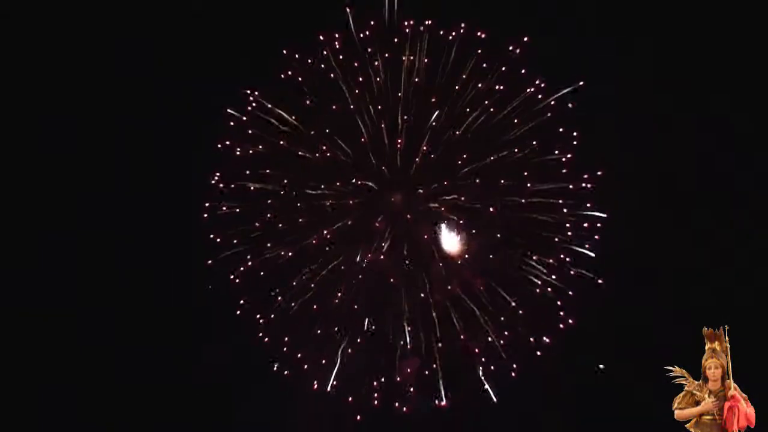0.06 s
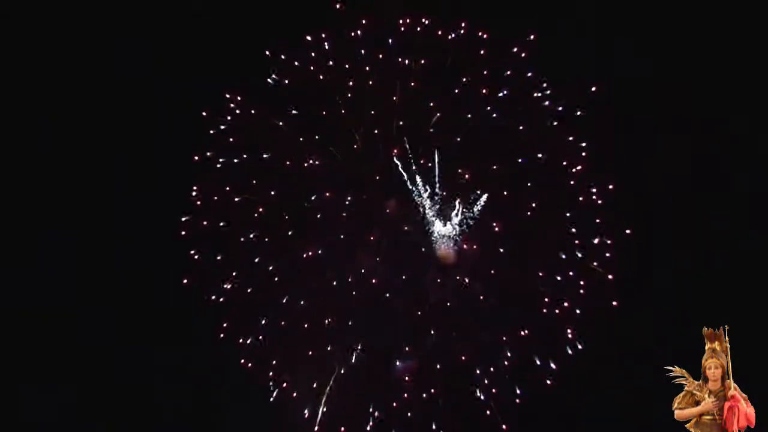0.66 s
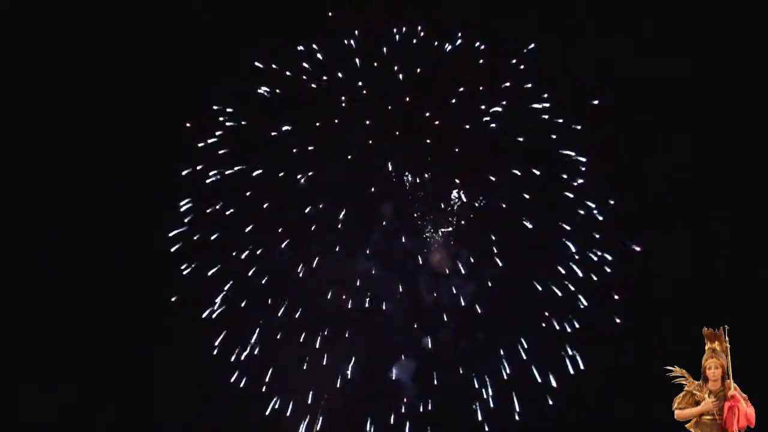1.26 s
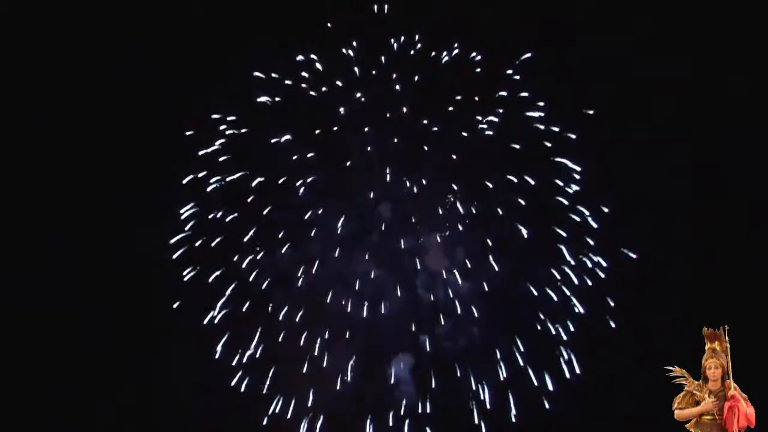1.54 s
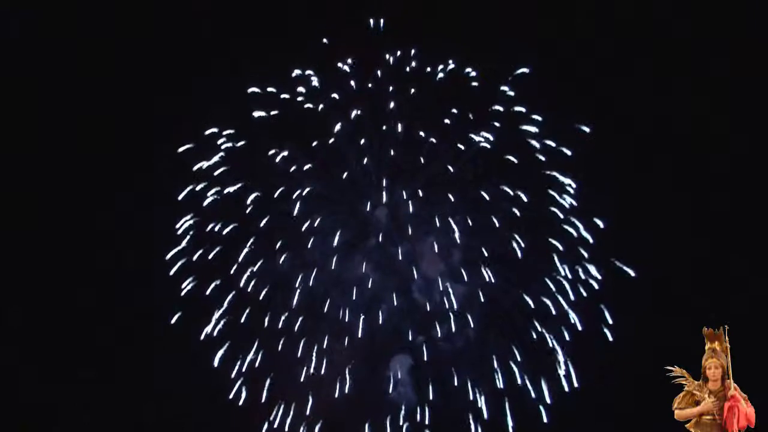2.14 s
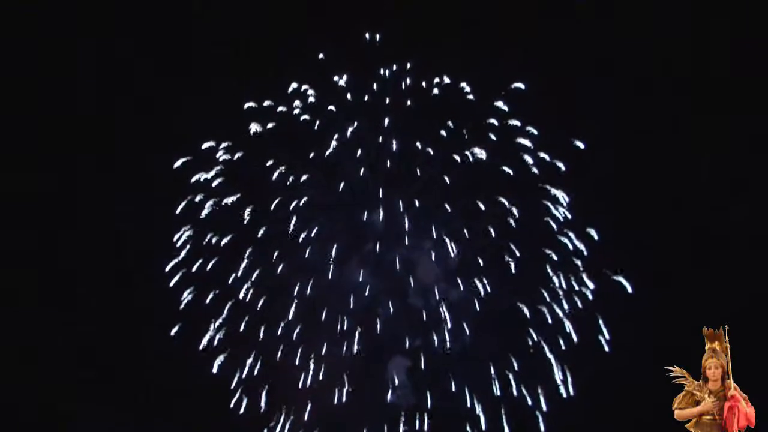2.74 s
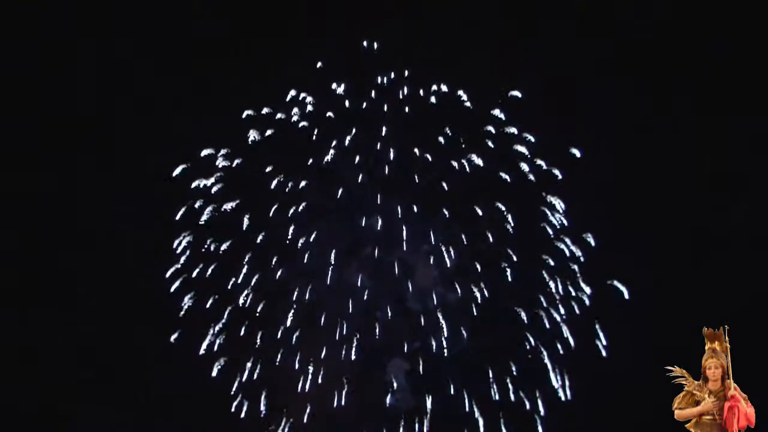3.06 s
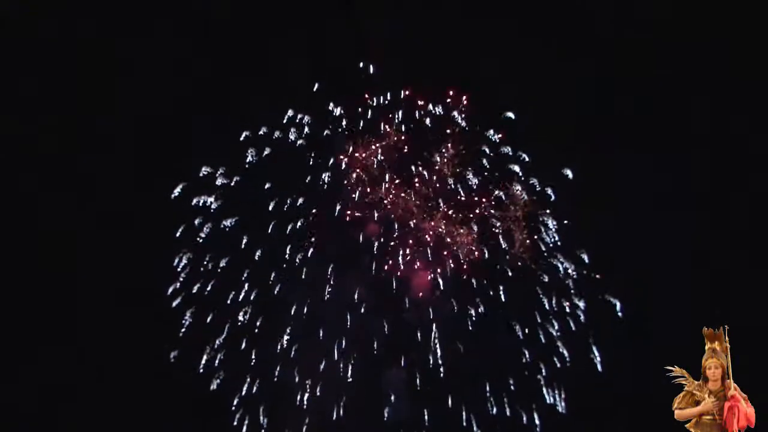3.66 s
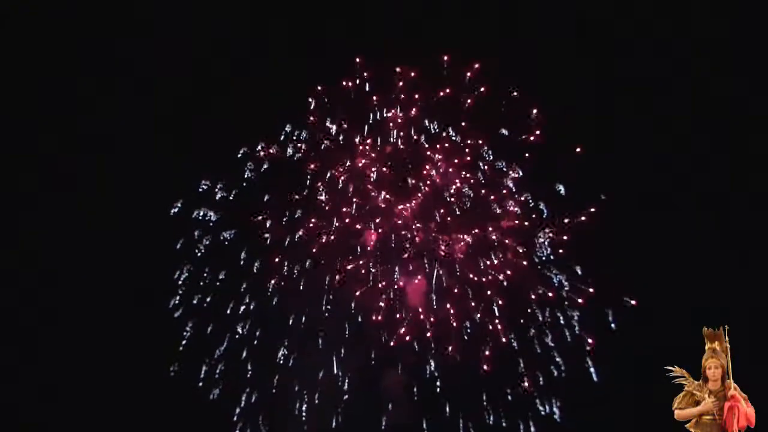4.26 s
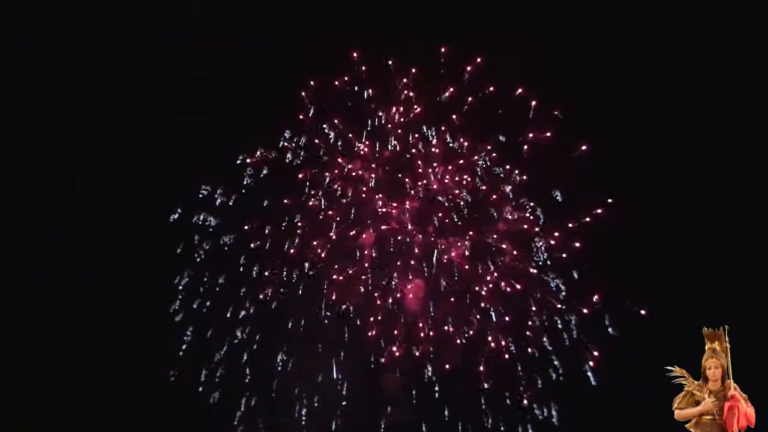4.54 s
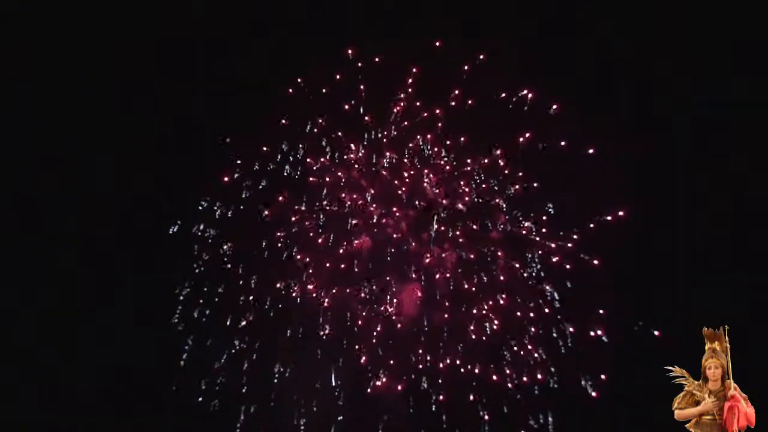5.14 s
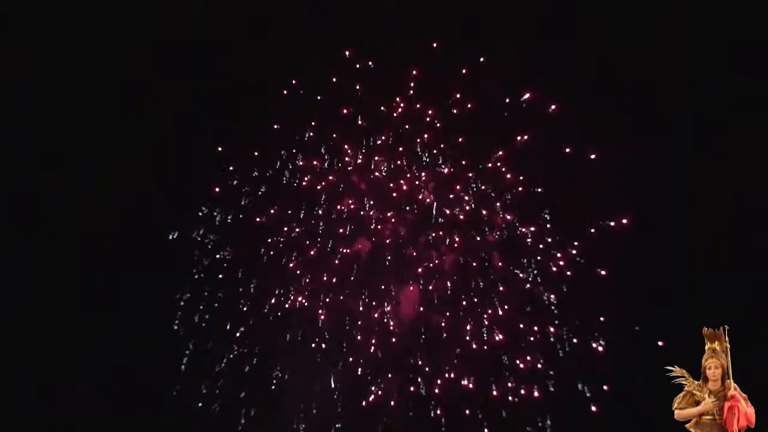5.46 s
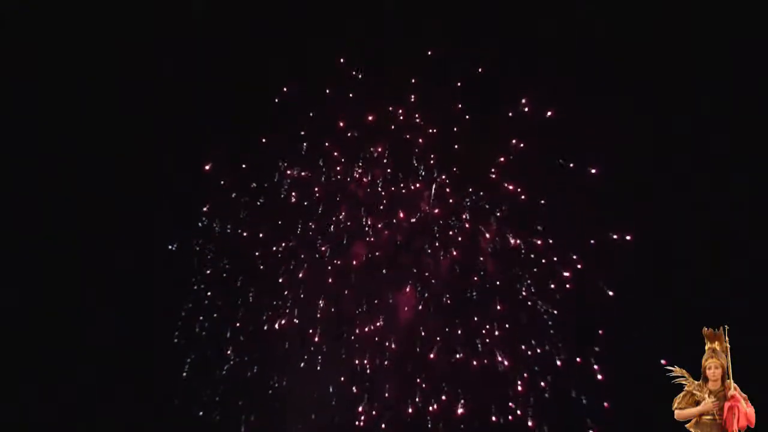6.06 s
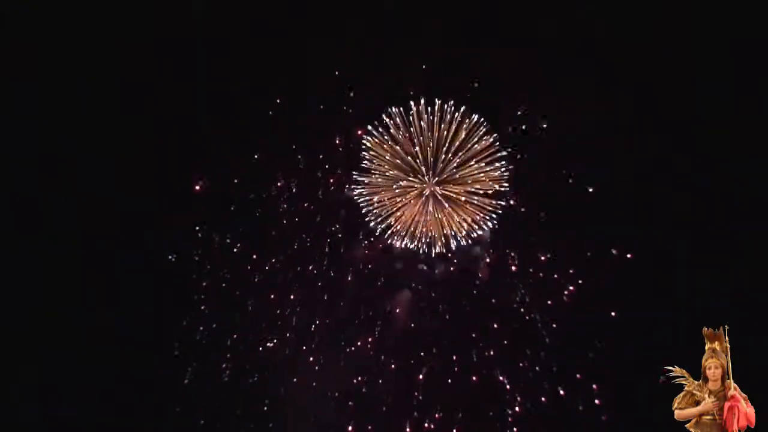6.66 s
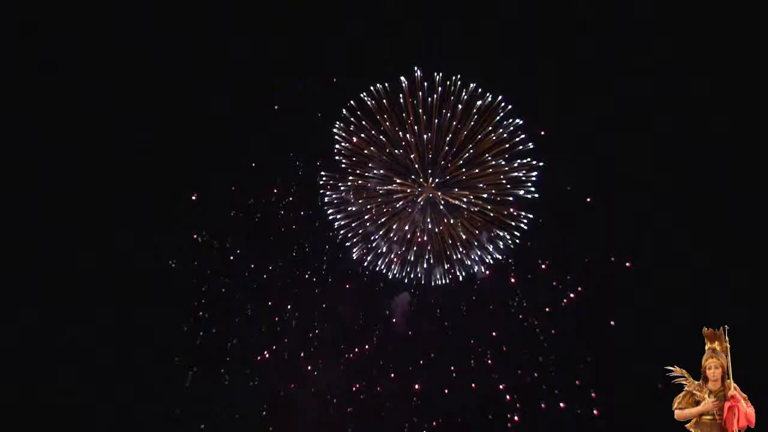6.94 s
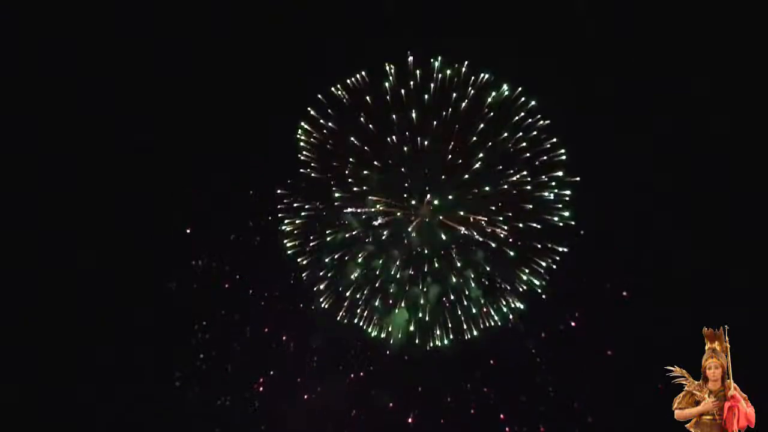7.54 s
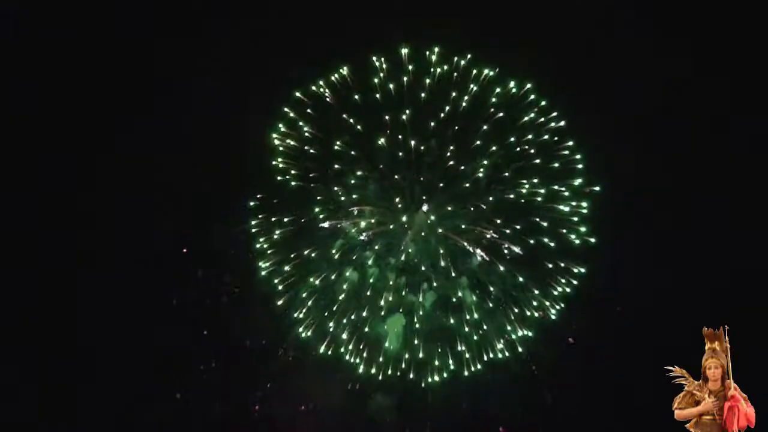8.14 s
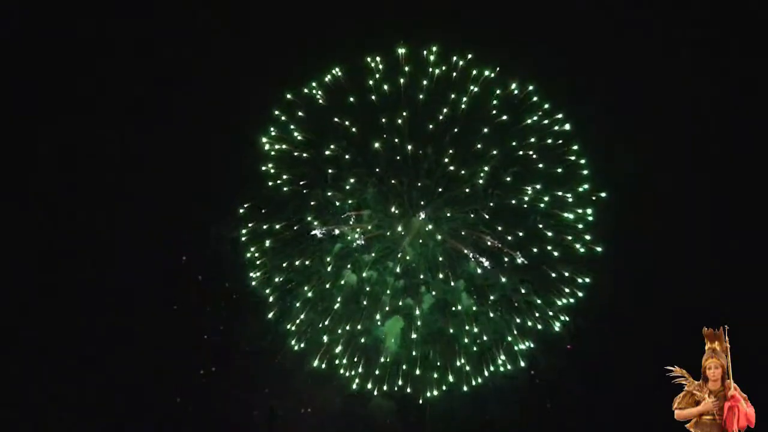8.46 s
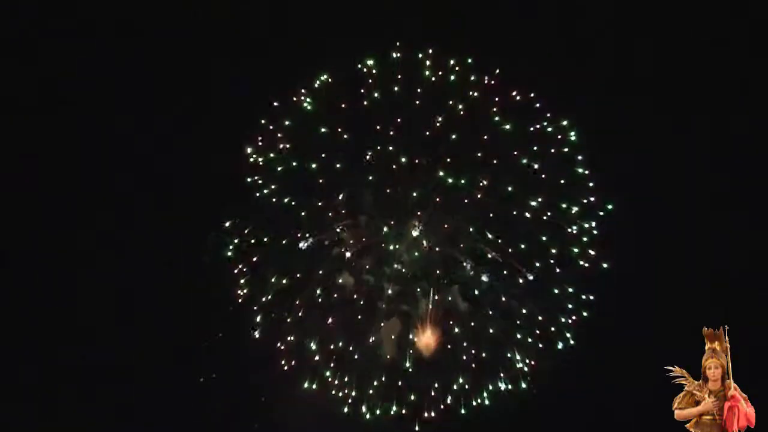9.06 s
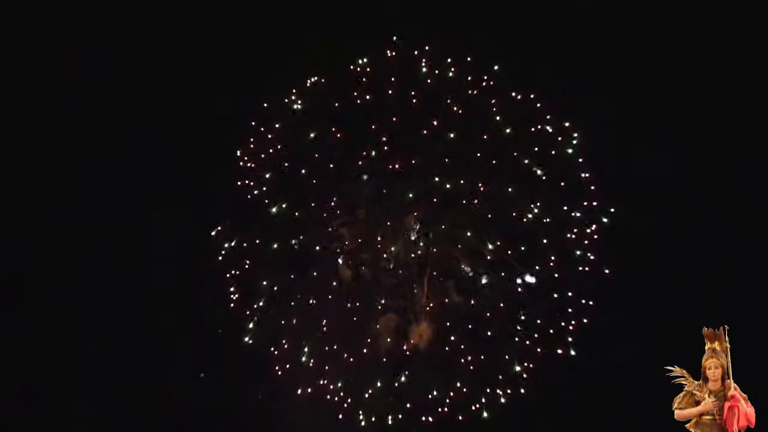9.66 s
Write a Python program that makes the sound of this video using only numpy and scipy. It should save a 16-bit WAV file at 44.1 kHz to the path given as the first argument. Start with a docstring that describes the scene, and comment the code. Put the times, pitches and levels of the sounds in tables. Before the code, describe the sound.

Fireworks burst outdoors with a sharp crack, a rapid salvo and a big echoing boom, amid crackling hiss and brief whistles.

```python
"""Fireworks a few hundred metres away at night, heard by a small overloaded stereo microphone.
A shell's echo is rolling at the start; burning stars hiss, tick and pop. At 1.2 s a shell cracks and
releases comets, whose gas jets hiss and whistle. A mortar thumps at 3.9 s, a salvo of small shells
follows at 4.7 s, one big boom at 8 s, another mortar at 8.9 s. Each burst is a shock front that
rolls back from ground, buildings and hills."""
import sys
import numpy as np
from scipy import signal
from scipy.fft import rfft, irfft, next_fast_len
from scipy.io import wavfile
from scipy.ndimage import uniform_filter1d

SR = 44100
rng = np.random.default_rng(int(sys.argv[2]) if len(sys.argv) > 2 else 0)


def dump_mix(stems):
    """Bounce the given channels to the path in sys.argv[1] as a 16-bit WAV at rate SR."""
    frames = np.atleast_2d(stems).T  # one column per channel
    limited = np.clip(frames, -1, 1)  # hard clip at full scale
    pcm = np.round(limited * 32767).astype(np.int16)
    wavfile.write(sys.argv[1], SR, pcm)


N = 432180
LEAD_S = .5  # early start: a shell is already rolling at t = 0
TIME = np.arange(-round(LEAD_S * SR), N) / SR


def amp(db):
    """Decibels to gain."""
    return 10 ** (np.asarray(db) / 20)


def unit_rms(x):
    """Scales to rms 1."""
    return x / np.sqrt(np.mean(x ** 2) + 1e-20)


def lookup(table, hz, column=1):
    """Interpolates a column over log frequency."""
    columns = np.transpose(table)
    return np.interp(np.log(hz + 1), np.log(columns[0] + 1), columns[column])


def add(mix, at_s, sound):
    """Mixes a sound in at at_s."""
    part = mix[..., max(round((at_s + LEAD_S) * SR), 0):][..., :sound.shape[-1]]
    part += sound[..., :part.shape[-1]]


def seconds(size):
    """Time axis of size samples."""
    return np.arange(size) / SR


def swell(t, rise_s):
    """Rises to 1 at rise_s, then decays."""
    u = np.maximum(t, 0) / rise_s
    return u * np.exp(1 - u)


def convolve(response, pulse):
    """Stereo response to a mono pulse, cut to the pulse's length."""
    return signal.fftconvolve(response, pulse[None], axes=1)[:, :len(pulse)]


def colour(x, spectrum, size=4096):
    """Minimum-phase filter."""
    log_gain = np.log(amp(lookup(spectrum, abs(np.fft.fftfreq(size, 1 / SR)))))
    taps = np.fft.ifft(np.exp(np.conj(signal.hilbert(log_gain)))).real[:size // 2]
    return signal.oaconvolve(np.atleast_2d(x), taps[None], axes=1)[:, :x.shape[-1]]


def clumps(size, depth_db, span):
    """Random gain, smoothed over span points."""
    drift = unit_rms(uniform_filter1d(rng.standard_normal(size), span))
    return unit_rms(amp(depth_db * drift))


# diffuse-field width: f/Hz, side re mid/dB
STEREO_WIDTH = [(30, -22.5), (150, -15.5), (500, -8), (2000, -8.5), (4000, -4), (8000, -13), (14000, -5)]

def diffuse(size, spectrum=None):
    """Stereo noise from all around, nearly mono in the bass."""
    n_fft = next_fast_len(size, True)
    hz = np.fft.rfftfreq(n_fft, 1 / SR)
    mid, side = rfft(rng.standard_normal((2, n_fft)))
    side = side * amp(lookup(STEREO_WIDTH, hz))
    gain = 1 if spectrum is None else amp(lookup(spectrum, hz))
    return unit_rms(irfft(np.array([mid + side, mid - side]) * gain, n_fft)[:, :size])


def echoes(bands, size, clump_db=0, stretch=1):
    """Dense reflections; each band decays with its own t60, times stretch."""
    hz, t, bins = signal.stft(diffuse(size), SR, nperseg=256, noverlap=192)
    t60_s = stretch * lookup(bands, hz, column=2)[:, None]
    level_db = lookup(bands, hz)[:, None] - 60 * t / t60_s
    bins = bins * amp(level_db) * clumps(len(t), clump_db, span=14)
    return signal.istft(bins, SR, nperseg=256, noverlap=192)[1][:, :size] / np.sqrt(SR)


# night ambience: f/Hz, density/dB
NIGHT_SPECTRUM = [(15, -34.5), (25, -6.5), (98, -5.5), (115, -11), (243, -19.5), (301, -21.5), (344, -25.5),
                  (475, -22), (1910, -25), (2240, -27.5), (2560, -30.5), (3930, -36), (5010, -47.5),
                  (6200, -35), (15000, -62.5)]

def night(level_db=-65.5):
    """Faint, steady, low noise."""
    return amp(level_db) * diffuse(len(TIME), NIGHT_SPECTRUM)


# gas rush: f/Hz, density/dB
GAS_SPECTRUM = [(60, -3.5), (200, -6.5), (300, -3), (600, -5), (1100, -5.5), (2400, -10.5), (3500, -19.5),
                (6500, -24.5), (9000, -37.5), (14000, -61)]
# launches: t/s, thump level/dB, thump f/Hz, rush level/dB, rush delay/s, rush rise/s
MORTAR_SHOTS = [(3.915, -37.5, 43, -47.5, 0.013, 0.024), (8.882, -30, 52.1, -34, 0.0029, 0.017)]

def mortars(echo_db=-20, echo_rise_s=.099):
    """A low push from the tube, then a rush of gas that lingers over the field."""
    out, t = np.zeros((2, len(TIME))), seconds(SR)
    push = swell(t, rise_s=.012) ** 2
    for at_s, thump_db, hz, rush_db, delay_s, rise_s in MORTAR_SHOTS:
        add(out, at_s, amp(thump_db) * push * np.sin(2 * np.pi * hz * t))
        rush = swell(t - delay_s, rise_s) ** .62 + amp(echo_db) * swell(t - delay_s, echo_rise_s)
        add(out, at_s, amp(rush_db) * rush * diffuse(len(t), GAS_SPECTRUM))
    return out


def snap(bandwidth_hz, scatter_db, decay_s):
    """One tiny explosion: a pressure pulse and its scatter."""
    t = seconds(2400)
    u = np.pi * bandwidth_hz * t
    pulse = (u - 1) * np.exp(-u)
    scatter = diffuse(len(t)) * np.exp(-t / decay_s) / np.sqrt(decay_s * SR / 2)
    return pulse + amp(scatter_db) * convolve(scatter, pulse)


# star hiss: f/Hz, density/dB
SIZZLE_SPECTRUM = [(100, -14), (300, -10), (500, 3), (1300, 1.5), (2700, -2.5), (3400, -13.5), (4300, -8),
                   (5100, -17.5), (7000, -18), (9000, -29), (15000, -45.5)]
# colour of ticks and pops: f/Hz, gain/dB
SNAP_EQ = [(100, -50), (400, -9.5), (800, 1.5), (2400, 9), (3400, 1.5), (4500, 0.5), (7000, -10),
           (9000, -30), (15000, -30)]
# burning star clouds: t/s, hiss level/dB, hiss fade/(dB/s), tick level/dB
CLOUDS = [(-.3, -42.5, 12.5, -28.5), (1.9, -69, 5, -59.5), (8.0, -58, 3, -39.5)]

def crackle(count=700, rise_s=.4, tick_fade_db_per_s=7):
    """Star clouds light up, then hiss and tick at random as they fade."""
    hiss_gain, tick_gain = np.zeros((2, len(TIME)))
    for at_s, hiss_db, hiss_fade_db_per_s, tick_db in CLOUDS:
        lit = np.clip((TIME - at_s) / rise_s, 0, 1)
        age_s = np.maximum(TIME - at_s - rise_s, 0)
        hiss_gain = np.hypot(hiss_gain, lit * amp(hiss_db - hiss_fade_db_per_s * age_s))
        tick_gain = np.hypot(tick_gain, lit * amp(tick_db - tick_fade_db_per_s * age_s))
    ticks = np.zeros((2, len(TIME)))
    for when, size in rng.random((count, 2)):
        i = int(when * len(TIME))
        tick = snap(bandwidth_hz=3000, scatter_db=2, decay_s=.0037)
        add(ticks, TIME[i], size ** 2 * tick_gain[i] * tick)
    return colour(ticks, SNAP_EQ) + hiss_gain * diffuse(len(TIME), SIZZLE_SPECTRUM)


# loudest stars: t/s, relative level/dB, bandwidth/Hz
STAR_POPS = [(0.354, -31, 1270), (0.5491, -26.5, 1760), (0.5881, -25, 2360), (0.6366, -31.5, 1270),
             (0.6736, -36, 2040), (0.7956, -33.5, 1550), (0.8936, -33.5, 1750), (0.9554, -33.5, 1670),
             (0.9766, -31.5, 1770), (1.0824, -30, 1530), (2.5847, -33.5, 2260), (2.6489, -41, 2130),
             (2.7616, -30.5, 1477), (2.8155, -43.5, 1445), (3.1477, -39, 1800), (3.1751, -33, 1500),
             (3.2121, -44.5, 1340), (3.4291, -47, 1517), (3.5737, -33, 2258), (5.2193, -28, 1680),
             (5.8001, -32, 1866), (6.3905, -36.5, 1370)]

def pops(gain_db=2, scatter_db=-4, decay_s=.0095):
    """Stars pop; the ground returns each pop about 4 ms later."""
    out = np.zeros((2, len(TIME)))
    for at_s, db, bandwidth_hz in STAR_POPS:
        add(out, at_s, amp(db) * snap(bandwidth_hz, scatter_db, decay_s))
        ground_s = rng.uniform(.00391, .004002)
        add(out, at_s + ground_s, amp(db) * snap(bandwidth_hz, scatter_db, decay_s))
    return amp(gain_db) * colour(out, SNAP_EQ)


# comet jets: f/Hz, density/dB
JET_SPECTRUM = [(150, -42), (250, -33), (294, -16), (619, -17), (716, -5), (829, -17.5), (928, -3),
                (1090, -8.5), (1800, -7.5), (2340, -7), (2840, -8), (3450, -18), (3990, -14.5),
                (6810, -26.5), (12000, -73.5), (15600, -113), (22000, -120)]

def comets(full_s=1.455, burn_s=.45, full_db=-30, sputter_db=3):
    """Jets of burning gas flare, sputter, burn down and leave a dulling echo."""
    rise_db_per_s, sag_db_per_s, out_db_per_s = 150, 21.5, 60
    echo_start_db, echo_fade_db_per_s, dull_db_per_octave_s = -15, 16, 3.5
    hz, t, bins = signal.stft(diffuse(len(TIME), JET_SPECTRUM), SR, nperseg=512)
    sputter = uniform_filter1d(rng.standard_normal(bins.shape), 3, axis=1)
    sputter = unit_rms(uniform_filter1d(sputter, 24, axis=0))
    age_s = t - LEAD_S - full_s
    early_s, burnt_s, spent_s = np.maximum([-age_s, age_s, age_s - burn_s], 0)
    jet_db = -sag_db_per_s * burnt_s - out_db_per_s * spent_s
    echo_db = echo_start_db - echo_fade_db_per_s * burnt_s
    level_db = full_db - rise_db_per_s * early_s + np.maximum(jet_db, echo_db)
    octaves = np.log2(np.maximum(hz, 200) / 2000)[:, None]
    dull_db = dull_db_per_octave_s * np.minimum(spent_s, 1) * octaves
    bins = bins * amp(level_db - dull_db + sputter_db * sputter)
    return signal.istft(bins, SR, nperseg=512)[1][:, :len(TIME)]


# comet whistles: t/s, length/s, start f/Hz, target f/Hz, level/dB, width/Hz
WHISTLE_TONES = [(1.4, .56, 2800, 2215, -36.5, 300), (1.761, 0.67, 2322, 2220, -44.5, 120),
                 (1.959, 0.24, 2190, 2076, -43.5, 14), (2.209, 0.3, 2142, 2086, -45.5, 5),
                 (2.441, 0.28, 2125, 2294, -53, 85)]

def whistles(settle_share=.37, peak_share=.32, octave_db=-23, flutter=.34, rasp_rad=.5):
    """Burning tubes glide towards a pitch; tumbling and echoes smear it into a narrow band."""
    out = np.zeros((2, len(TIME)))
    for at_s, length_s, start_hz, target_hz, db, width_hz in WHISTLE_TONES:
        progress = np.arange(0, length_s, 1 / SR) / length_s
        hz = target_hz + (start_hz - target_hz) * np.exp(-progress / settle_share)
        arch = np.sin(np.pi / 2 * np.interp(progress, [0, peak_share, 1], [0, 1, 0]))
        drifts = uniform_filter1d(uniform_filter1d(rng.standard_normal((4, 2 * SR)), 130), 130)
        wander, left, right, grit = (unit_rms(drift[:len(progress)]) for drift in drifts)
        phase = 2 * np.pi * np.cumsum(hz + .577 * width_hz * wander) / SR
        overtone = amp(octave_db) * np.sin(2 * (phase + rasp_rad * grit))
        tone = unit_rms(np.sin(phase) + overtone)
        flicker = 1 + flutter * np.array([left, (left + right) / np.sqrt(2)])
        add(out, at_s, amp(db) * arch * tone * flicker)
    return out


# reverberation of grounds, buildings, hills: f/Hz, power per second/dB, t60/s
GROUND_BANDS = [(40, -6, 0.97), (150, 0, 0.68), (400, 8.5, 0.29), (1000, 10, 0.14), (3020, 2, 0.5),
                (7000, 3.5, 0.29), (14000, 5, 0.23)]
BUILDING_BANDS = [(30, -15, 1.5), (70, -8, 1.8), (130, -8, 0.39), (300, -12, 1.8), (600, -11.5, 1.4),
                  (1500, -10.5, 2.1), (3100, -9, 0.53), (3500, -7, 0.65), (3960, -8.5, 1.4),
                  (7000, -11.5, 1.2), (10000, -12, 0.84), (15000, -16.5, .4)]
HILL_BANDS = [(30, -32, 7.2), (99, -19, 4), (280, -36, 6.8), (500, -25, 7.8), (1000, -28, 9.3),
              (1980, -20, 4.7), (3270, -17.5, 4.6), (3240, -27.5, 2.8), (4300, -26, 5.4),
              (7000, -24.5, 1.1), (12000, -51.5, 1)]
# rumble from distant building fronts: f/Hz, density/dB
RUMBLE_SPECTRUM = [(20, -21.5), (50, 0.5), (85, 2), (160, -0.5), (220, -11), (330, -20), (700, -41),
                   (3000, -73)]

def landscape(roll_rise_s=.049, rumble_db=-29, rumble_rise_s=.13):
    """Impulse response of the surroundings: grounds, buildings, hills."""
    t = seconds(2 * SR)
    response = echoes(HILL_BANDS, 5 * SR, clump_db=.5)
    facets = clumps(len(t), depth_db=1.4, span=130)  # single facets crackle
    roll = echoes(BUILDING_BANDS, len(t), clump_db=2) * facets * (1 - np.exp(-t / roll_rise_s))
    rumble = amp(rumble_db) * swell(t, rumble_rise_s) * diffuse(len(t), RUMBLE_SPECTRUM) / np.sqrt(SR)
    response[:, :len(t)] += roll + rumble
    response[:, :SR // 2] += echoes(GROUND_BANDS, SR // 2)
    return response


# low thuds off walls: delay/s, level re distant echo/dB, rise/s
ECHO_THUDS = [(.13, -43.5, 0.008), (.278, -37.5, .018), (.405, -47, 0.031), (.555, -53.5, .03),
              (.725, -56.5, 0.049), (.81, -50.5, 0.01), (1.405, -52.5, .016)]
# brighter slaps off walls: delay/s, level re distant echo/dB, f/Hz, rise/s
ECHO_SLAPS = [(.265, -47, 750, .009), (.44, -52.5, 1490, .007)]

def wall_echoes(big_push_ms=3.3, big_thud_hz=75.3, roughness=.35):
    """Uneven walls return each burst as low thuds, some with a brighter slap."""
    db_per_doubling, octaves_per_doubling = 5.5, -.25  # longer push: louder, deeper
    out, t = np.zeros((2, len(TIME))), seconds(10000)
    for at_s, db, push_ms, *_, echo_db in SHELL_BURSTS:
        doublings = np.log2(push_ms / big_push_ms)
        sent_db = db + echo_db + db_per_doubling * doublings
        thud = np.sin(2 * np.pi * big_thud_hz * 2 ** (octaves_per_doubling * doublings) * t)
        for delay_s, wall_db, rise_s in ECHO_THUDS:
            body = thud + roughness * diffuse(len(t), RUMBLE_SPECTRUM)
            add(out, at_s + delay_s, amp(sent_db + wall_db) * swell(t, rise_s) * body)
        for delay_s, wall_db, hz, rise_s in ECHO_SLAPS:
            band = [(hz / 5, -30), (hz / 3.9, -2), (hz * 1.7, 0), (hz * 3, -18), (hz * 9, -45)]
            add(out, at_s + delay_s, amp(sent_db + wall_db) * swell(t, rise_s) * diffuse(len(t), band))
    return out


def shock_front(t, push_s):
    """A sudden push, then a longer suction."""
    return (1 - t / push_s) * np.exp(-t / push_s)


# scatter from nearby things: f/Hz, power per second/dB, t60/s
SCATTER_BANDS = [(40, 7.5, 0.16), (150, 14.5, 0.11), (400, 19, .05), (1000, 25, .04), (3000, 22, 0.053),
                 (6800, 22.5, 0.043), (14000, 19, 0.012)]
# blast colour after the air path: f/Hz, gain/dB
BLAST_EQ = [(15, -13), (40, 3.5), (100, 0), (300, -1.5), (600, 0), (1000, 1.5), (2300, 3), (3400, 0.5),
            (5000, -1), (7000, 2), (9000, -4.5), (12000, -11.5), (16000, -15.5)]
# bursts: t/s, level/dB, push/ms, ground delay/ms, scatter/dB, ring f/Hz, distant echo/dB
SHELL_BURSTS = [(-.055, 7.5, 3.2, 5.7, 2, 200, 3), (1.234, 12, 1.1, 6.6, -1.5, 303.2, -8),
                (4.6950, 8, 1.1, 3.6, -5, 206, 5.5), (4.7239, -2, .9, 4.2, -1, 205, 6),
                (4.7312, 4, 1.1, 4.2, -4, 207, 2.5), (4.7603, 1, 0.63, 4.2, 0, 262, 3),
                (4.7695, 11, 1.5, 5, -1.5, 216, 0.5), (4.7785, 4, 1.2, 5.3, 3.5, 257, 2),
                (4.7860, 2, .8, 4.1, 2.5, 270, 0.5), (4.8044, 0.5, .9, 3.8, -3, 258, 0.5),
                (4.8100, 8.5, .8, 4.3, 2, 243, -3.5), (4.8412, 5.5, .7, 4.4, 0, 282, -2),
                (4.918, 6, 1.3, 7.3, 3.5, 228, 3), (4.948, 3, .7, 4.2, 2.5, 260, 1.5),
                (4.9676, 5.5, .7, 4.4, 6, 257, -3), (4.9823, 0.5, 0.8, 4.2, 1, 265, 1),
                (5.0238, 2, .7, 4.2, -1.5, 260, 1), (7.965, 7.5, 2.8, 13.5, -1.5, 250.5, 3)]

def shells(ground_gain=.41, ground_smooth_s=.00005, scatter_rise_s=.00037, far_push_s=.0011):
    """Each shock front arrives directly, off the ground, off nearby things and from far away."""
    ring_db, ring_rise_s = -16, .0045  # flutter between nearby walls
    close, sent, t = np.zeros((2, len(TIME))), np.zeros(len(TIME)), seconds(6000)
    pole = np.exp(-1 / (ground_smooth_s * SR))  # rough ground rounds off the front
    for at_s, db, push_ms, ground_ms, scatter_db, ring_hz, echo_db in SHELL_BURSTS:
        shock = amp(db) * shock_front(t, push_ms / 1000)
        stretch = push_ms ** .38  # big shells tear for longer
        scatter = echoes(SCATTER_BANDS, len(t), stretch=stretch)
        scatter *= (1 - np.exp(-t / scatter_rise_s)) / np.sqrt(stretch)
        ragged = shock + amp(scatter_db) * convolve(scatter, shock)
        ring = amp(db + ring_db) * swell(t, ring_rise_s) * np.cos(2 * np.pi * ring_hz * t)
        add(close, at_s, ragged + ring)
        bounce = ground_gain * signal.lfilter([1 - pole], [1, -pole], ragged)
        add(close, at_s + ground_ms / 1000, bounce)
        far = amp(db + echo_db) * shock_front(t, far_push_s)
        brightness = amp(-15) * push_ms ** 1.6  # big shells echo brighter
        add(sent, at_s, far + brightness * np.diff(far, prepend=0))
    return colour(close + convolve(landscape(), sent), BLAST_EQ)


def scene():
    """The display over the quiet of the night."""
    mix = night() + shells() + wall_echoes() + pops() + crackle() + mortars() + comets() + whistles()
    return mix[:, -N:]


# capsule mismatch: f/Hz, left re right/dB
CAPSULE_BALANCE = [(30, -9.5), (70, -3), (140, -0.74), (1000, -0.6), (2000, 0.27), (4000, 0), (12000, 0)]
# microphone response: f/Hz, gain/dB
MIC_EQ = [(10, -21), (24, -11), (38, 1.5), (1000, -0.5), (7000, -2), (9000, -5.5), (12000, -11),
          (16000, -20)]

def record(dry, ceiling=.9, cutoff_hz=16000):
    """Two slightly unequal capsules overload on the blasts; the treble falls away."""
    balance_db = lookup(CAPSULE_BALANCE, np.fft.rfftfreq(N, 1 / SR)) * np.array([[.5], [-.5]])
    heard = irfft(rfft(dry) * amp(balance_db), N)
    clipped = ceiling * np.tanh(heard / ceiling)
    lowpass = signal.firwin(511, cutoff_hz, window=("kaiser", 9), fs=SR)
    return signal.oaconvolve(colour(clipped, MIC_EQ, size=16384), lowpass[None], "same")


dry = scene()
out = record(dry)
dump_mix(out)
```